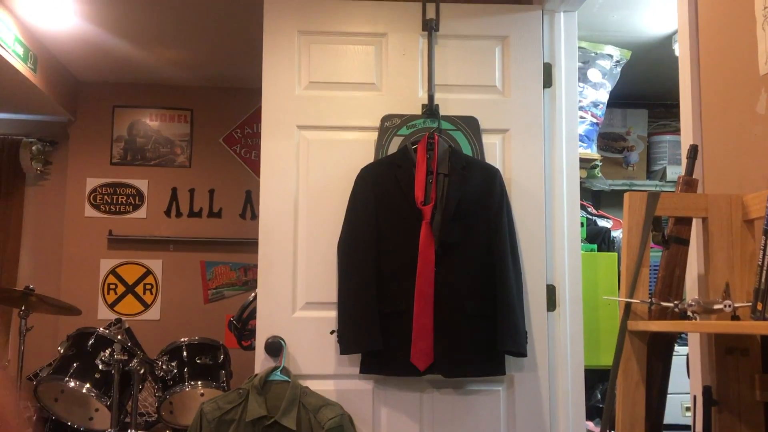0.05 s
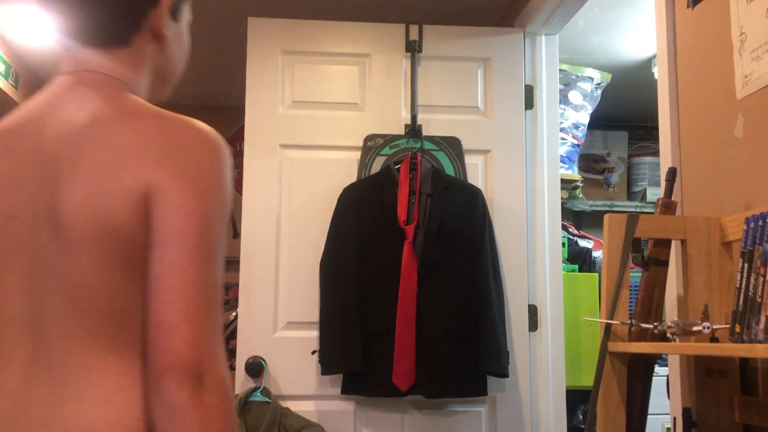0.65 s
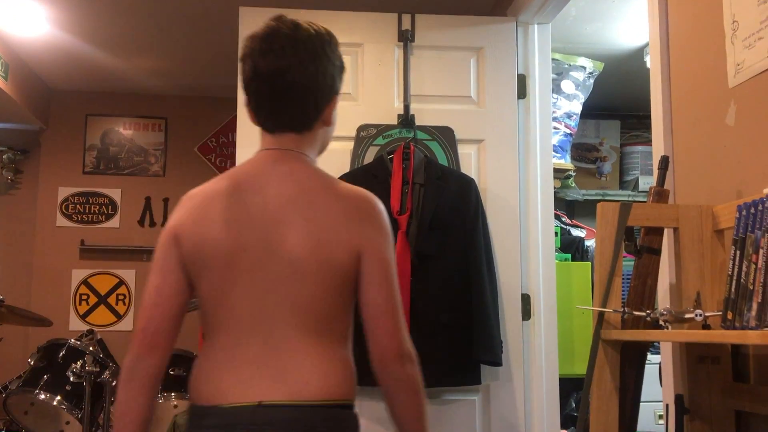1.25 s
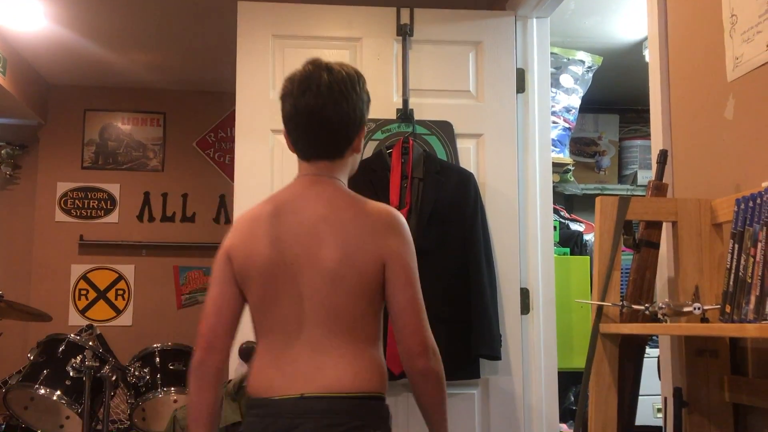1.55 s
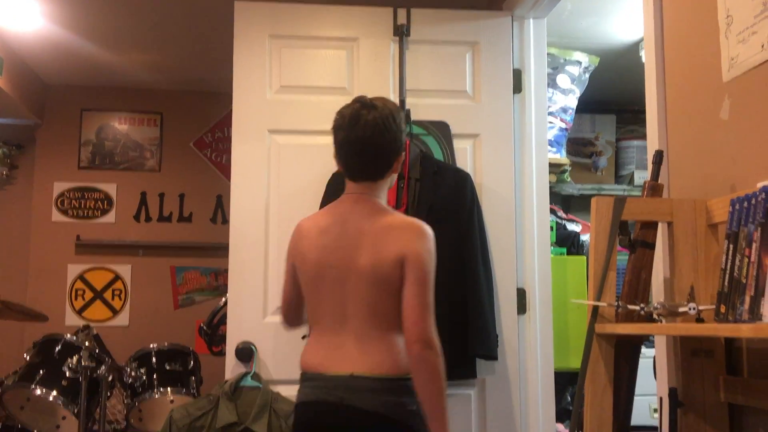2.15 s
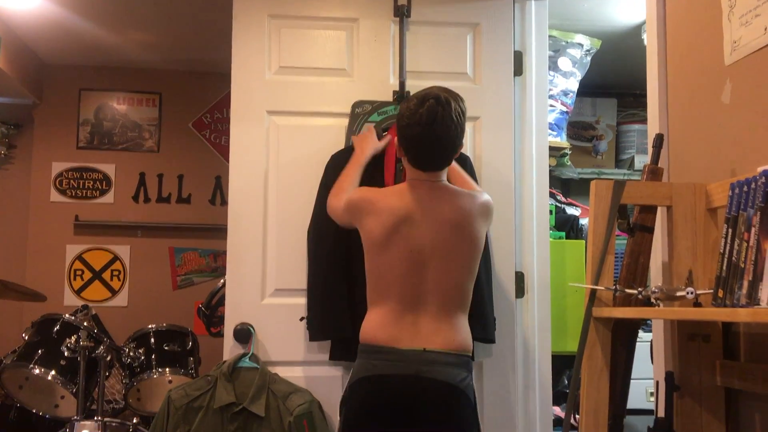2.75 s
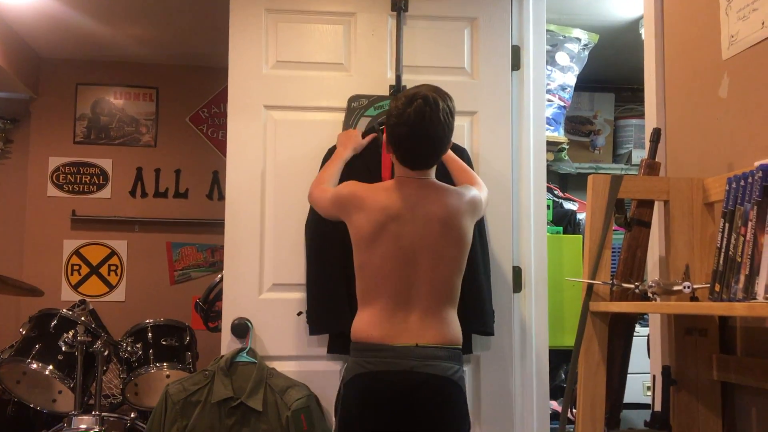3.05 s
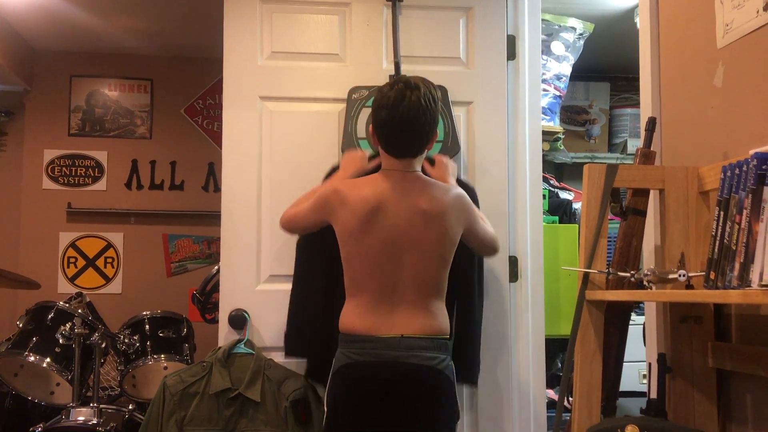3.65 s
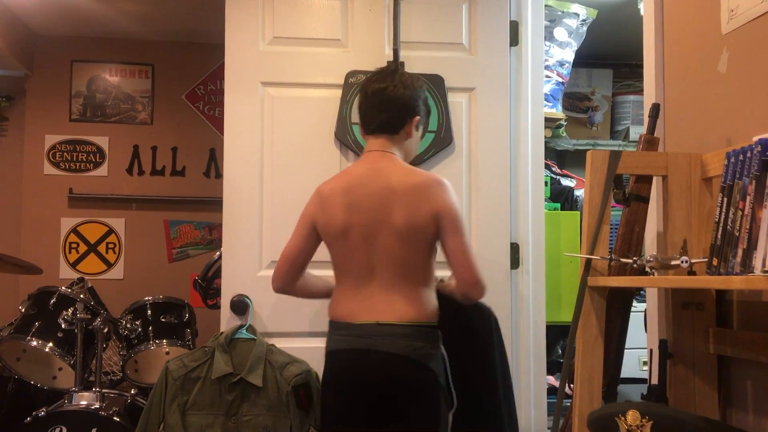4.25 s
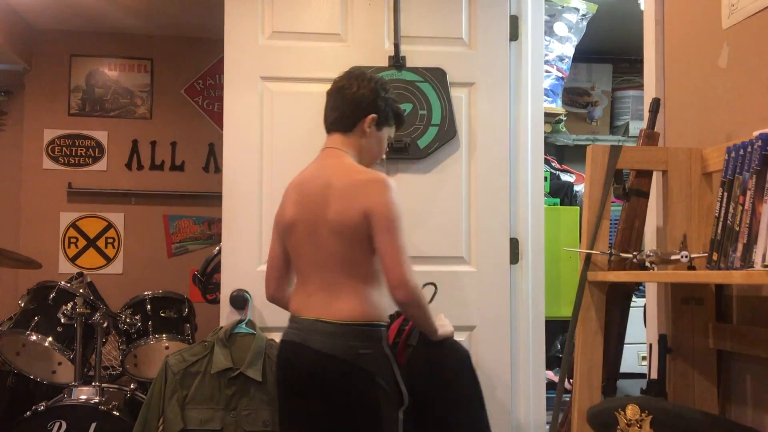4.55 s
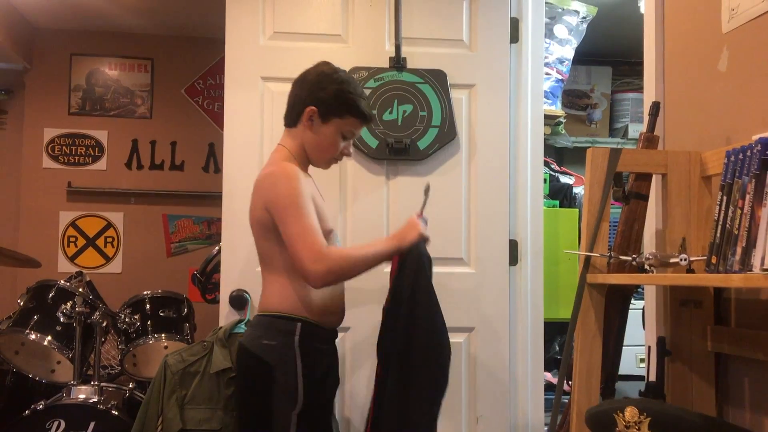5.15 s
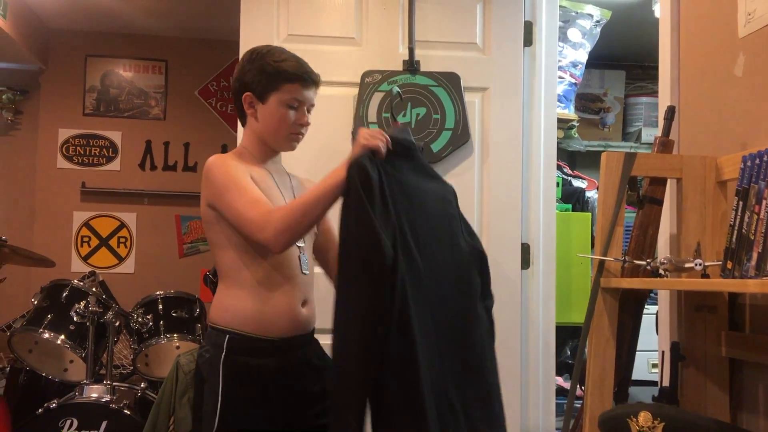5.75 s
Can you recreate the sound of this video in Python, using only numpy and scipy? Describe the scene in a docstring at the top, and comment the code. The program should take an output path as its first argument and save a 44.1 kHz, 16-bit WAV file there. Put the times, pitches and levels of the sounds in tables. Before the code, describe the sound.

Dull, booming barefoot steps move unevenly over wooden boards in a small furnished room, soles scuffing and clothes swishing softly. A hanger with a metal hook taps a door several times as a jacket comes down. Then the steps bunch together as the person turns, the fabric rustles and the boards pop more sharply. The microphone picks up a steady low rumble, with its own faint hiss and rapid ticking.

```python
"""A small bedroom: low room rumble, microphone hiss and faintly ticking camera electronics run throughout.
Someone crosses it barefoot: heels boom in the wooden floor, soles scuff, cloth rustles, a few boards pop.
Around 3 s they lift a jacket off the door; its hanger knocks on the panel, with a bright edge from the hook.
From about 4.3 s they turn with it, in a huddle of quick steps, brushing cloth and louder creaks."""
import sys
import numpy as np
from scipy import signal
from scipy.fft import rfft, irfft
from scipy.io import wavfile
from scipy.ndimage import uniform_filter1d

SR = 44100
rng = np.random.default_rng(int(sys.argv[2]) if len(sys.argv) > 2 else 0)


def inscribe(sig):
    """Save sig as 16-bit PCM at rate SR to the path in sys.argv[1].

    A 1-D sig is mono; a 2-D sig holds one channel per row.
    Samples are clipped to [-1, 1] before scaling.
    """
    pcm = np.round(np.clip(np.atleast_2d(sig).T, -1, 1) * 32767)
    wavfile.write(sys.argv[1], SR, pcm.astype(np.int16))


N = 259308
TIME = np.arange(N) / SR

# Footfalls and shifts of weight: (time [s], boom level [dB], boom pitch [Hz], boom t60 [s],
# knock level [dB], board pitch [Hz], sole scuff level [dB])
FOOTFALLS = [(0.284, -26, 59, 0.26, -41, 192.3, -57), (0.52, -53, 60, .15, -35, 162.6, -67),
             (1.256, -28, 57, 0.3, -38, 172, -48), (1.742, -27.5, 57, 0.28, -45.5, 172.7, -44),
             (2.074, -44, 62, 0.11, -53.5, 109, -63), (2.16, -42, 57.3, 0.15, -53, 156, -59.5),
             (2.226, -39.5, 54.3, 0.34, -53.5, 177.7, -49), (2.626, -29.5, 64, .42, -48.5, 160, -55),
             (2.972, -43, 54.7, 0.4, -41, 173, -67), (3.625, -25, 59, .33, -31.5, 178.4, -47),
             (4.324, -30.5, 71.5, 0.15, -39, 132, -46), (4.373, -29.5, 53.5, 0.11, -44.5, 181.2, -69),
             (4.799, -34.5, 57, 0.1, -51, 172, -60), (4.855, -23, 65.4, .1, -45, 173.3, -48.5),
             (4.943, -34.5, 64, 0.27, -44.5, 162.8, -56), (5.228, -25.5, 59.5, 0.2, -64, 130, -56),
             (5.366, -32.5, 53, .09, -50, 131, -57), (5.441, -29.5, 63, 0.057, -44.5, 163.1, -51.5),
             (5.717, -33, 52, 0.18, -51, 138, -67)]


def undb(db):
    """Decibels to gain."""
    return 10 ** (np.asarray(db) / 20)


def unit(x):
    """Scale to rms 1."""
    return x / np.sqrt(np.mean(x ** 2))


def add(out, s, sound):
    """Mix a sound in at s seconds."""
    start = max(int(s * SR), 0)
    out[start:start + len(sound)] += sound[:N - start]


def noise(colour):
    """Noise at rms 1, shaped by (frequency [Hz], level [dB]) points; 20 dB/octave roll-off past the ends."""
    hz, db = np.transpose(colour)
    octave = np.log2(np.maximum(np.fft.rfftfreq(N, 1 / SR), 1))
    outside = np.abs(octave - np.clip(octave, np.log2(hz[0]), np.log2(hz[-1])))
    eq = undb(np.interp(octave, np.log2(hz), db) - 20 * outside)
    return unit(irfft(rfft(rng.standard_normal(N)) * eq, N))


def resonate(x, hz, width_hz):
    """One resonance, gain 1 at its centre."""
    return signal.lfilter(*signal.iirpeak(hz, hz / width_hz, fs=SR), x)


def wander(rate):
    """Random modulation with a spread near 1, gliding to a new value rate times a second."""
    return np.interp(TIME * rate, np.arange(4096), rng.standard_normal(4096))


def swell(t, rise, t60):
    """Contact envelope: a rounded attack, then a decay of 60 dB in t60 seconds."""
    attack = np.sin(np.pi / 2 * np.minimum(t / rise, 1)) ** 2
    return attack * np.exp(-np.log(1000) * np.maximum(t - rise, 0) / t60)


def ringing(modes):
    """Resonances stirred at random, as by a room's many reflections, held at a steady rms of 1."""
    scatter = noise([(250, 10), (400, -5), (2200, -10), (3000, -13.5)])
    ring = sum(undb(db) * resonate(np.roll(scatter, rng.integers(N)), hz, width)
               for hz, width, db in modes)
    return ring / np.sqrt(uniform_filter1d(ring ** 2, size=880))


def contacts(hits, body, bright, size=22050):
    """Each contact stirs a body, a hollow ring and a bright edge that dies sooner."""
    # The furnished room's hollow ring: (frequency [Hz], width [Hz], level [dB])
    room_modes = [(962, 120, 4), (1109, 106, 7), (1352, 15, 9.5), (1490, 250, 2.5), (1843, 26, 7.5),
                  (2105, 44, 3)]
    out, t, ring = np.zeros(N), TIME[:size], ringing(room_modes)
    for s, db, ring_db, bright_db, rise, t60 in hits:
        at = rng.integers(N - size) + np.arange(size)
        dull = (body[at] + undb(ring_db) * ring[at]) * swell(t, rise, t60)
        edge = undb(bright_db) * bright[at] * swell(t, rise, 0.85 * t60)
        add(out, s, undb(db) * (dull + edge))
    return out


def room(x, wet_db, t60, size=17640):
    """Close walls add a short reverb tail."""
    tail = noise([(100, -17), (2000, -15), (8000, -2)])[:size] * swell(TIME[:size], 0.0031, t60)
    return x + undb(wet_db) * signal.fftconvolve(x, tail / np.linalg.norm(tail))[:N]


def rumble():
    """The room tone: a low bed whose level drifts gently."""
    # Rumble colour: (frequency [Hz], level [dB])
    colour = [(20, -27), (33, -28), (42, 1), (52, -7.5), (62, 3), (80, -11), (120, -15), (300, -21.5),
              (700, -45), (2000, -69), (3000, -54)]
    return noise(colour) * undb(-52.5 + 1.6 * wander(rate=3.2))


def tick_times(fast_s=0.05, slow_s=1, late_share=0.55, late_max_s=0.01, jitter_s=0.0003):
    """A fast clock beats unsteadily, and every other beat may drag; a slow, even clock joins in."""
    beats = np.arange(0.0178, TIME[-1], fast_s)
    chance, delay = rng.random((len(beats), 2)).T
    late = (np.arange(len(beats)) % 2 == 1) & (chance < late_share)
    beats = beats + late * late_max_s * np.sqrt(delay) + jitter_s * rng.standard_normal(len(beats))
    return np.append(beats, np.arange(0.103, TIME[-1], slow_s))


def camera(pip_hz=2130, weak_every_s=0.3):
    """Electrical spikes tick through one resonant path, over steady hiss; each pip brings its own spike."""
    # Dry pips among the ticks: (time [s], level [dB])
    pip_cues = [(0.068, -47.5), (0.725, -42.5), (1.025, -45.5), (1.577, -46), (1.924, -44), (2.077, -49),
                (2.397, -47), (2.807, -44), (3.080, -43.5), (3.425, -46), (4.025, -45.5), (4.854, -44.5),
                (5.674, -46)]
    # The ring of a tick: (frequency [Hz], width [Hz], level [dB])
    tick_modes = [(2070, 700, -5), (4210, 230, -8.5), (5950, 720, 0.5), (7580, 430, -8.5),
                  (8150, 180, -7.5), (9650, 380, -13.5), (10850, 680, -15.5), (12300, 1500, -15.5),
                  (14000, 570, -16)]
    spikes, pips, t = np.zeros(N), np.zeros(N), TIME[:512]
    for s in tick_times():
        add(spikes, s, undb([1.5 * rng.standard_normal()]))
    for s in np.arange(0.13, TIME[-1], weak_every_s):  # a third clock, slightly weaker
        add(spikes, s, undb([-1]))
    pip = swell(t, rise=0.0014, t60=0.0035) * np.sin(2 * np.pi * pip_hz * t)
    for s, db in pip_cues:
        add(pips, s, undb(db) * pip)
        add(spikes, s, undb([-3]))
    # neighbouring resonances have opposite polarity, which smears each tick a little
    ticks = sum((-1) ** k * undb(db) * resonate(spikes, hz, width)
                for k, (hz, width, db) in enumerate(tick_modes))
    # Microphone hiss: (frequency [Hz], level [dB])
    hiss_colour = [(1000, 3.5), (2200, 1), (3200, -5), (4500, -1), (6100, 0.5), (7800, -4), (9200, -3),
                   (10300, -7), (11300, -8), (12700, -3.5), (15500, -9)]
    return undb(-23.5) * ticks + pips + undb(-70) * noise(hiss_colour)


def swishes():
    """Fine weave sliding on itself gives a thin, airy swish that swells and fades."""
    # Slides of cloth over cloth: (time [s], level [dB], length [s])
    slides = [(0.042, -74, .1), (0.536, -70, 0.18), (2.05, -72, 0.1), (3.036, -72, 0.36), (4.04, -69, .14),
              (4.14, -75, 0.25)]
    # Sheen of the weave: (frequency [Hz], level [dB])
    weave_colour = [(3500, -6), (5000, -2), (8500, -2), (10300, -5), (12000, 0), (13500, -4), (15500, -10)]
    speed = np.zeros(N)
    for s, db, length in slides:
        add(speed, s, undb(db) * np.hanning(int(length * SR)))
    grip = undb(2 * wander(rate=150))
    return speed * grip * noise(weave_colour)


def rustle(flap_trim_db=-1.5, shake_trim_db=-9.5):
    """Moving clothes rustle in small grains and flap softly; each footfall shakes out more flapping."""
    # Level ride as body and jacket move: (time [s], rustle level [dB], flap level [dB])
    motion = [(0.0, -66.5, -59), (0.24, -68.5, -47.5), (0.54, -59, -52.5), (0.67, -57, -48),
              (0.83, -70, -50), (1.1, -63, -62), (1.26, -64.5, -54), (2.01, -70, -58.5), (2.95, -65, -59),
              (3.1, -63.5, -52.5), (3.36, -67, -58.5), (3.77, -60, -49.5), (4.13, -66, -60),
              (4.5, -61.5, -58), (5.31, -64.5, -58.5), (5.45, -59.5, -57), (5.75, -62.5, -47),
              (5.88, -54.5, -47)]
    # Colours of the rustle and the low flapping: (frequency [Hz], level [dB])
    cloth_colour = [(350, -6.5), (600, 7.5), (850, -2), (1200, 1.5), (2000, -1), (2800, -14.5), (5000, -17),
                    (12000, -27.5)]
    flap_colour = [(70, 8), (120, 3.5), (175, 3), (240, -0.5), (330, 0), (480, -24), (800, -21.5)]
    times, cloth_db, flap_db = np.transpose(motion)
    grains_db = 1.8 * wander(rate=35) + 2.5 * wander(rate=400)
    folds_db = 2.2 * wander(rate=25)
    shake = np.zeros(N)
    for s, _, _, _, knock_db, *_ in FOOTFALLS:
        add(shake, s, undb(knock_db + shake_trim_db) * swell(TIME[:SR], rise=0.059, t60=0.34))
    cloth = noise(cloth_colour) * undb(np.interp(TIME, times, cloth_db) + grains_db)
    sway = undb(np.interp(TIME, times, flap_db) + flap_trim_db)
    flap = noise(flap_colour) * np.hypot(sway, shake) * undb(folds_db)
    return cloth + flap


def scuffs():
    """Soles at each footfall, and cloth in between, catch and slip unevenly as they brush past."""
    # Cloth and skin brushing by: (time [s], level [dB], brightness [dB], rise [s], t60 [s])
    brushes = [(0.116, -61, -5, 0.0027, 0.22), (0.525, -52, -10, 0.0016, 0.75),
               (0.587, -43, -35, 0.007, .16), (0.751, -52, -2, 0.019, 0.25), (1.080, -59.5, 0, 0.024, .4),
               (1.198, -55, -16, .003, .1), (1.299, -67, -25, 0.00092, 0.17),
               (2.537, -61, -16, 0.0095, 0.25), (4.085, -58.5, 1, 0.0029, 0.3),
               (4.204, -57.5, -19, 0.0033, 0.15), (4.295, -52, -22, 0.0015, 0.12),
               (4.530, -52, -41, 0.0044, 0.19), (4.614, -63.5, 11.5, 0.0078, 0.17),
               (5.067, -53, -2.5, 0.0046, 0.22), (5.435, -46.5, -13, 0.012, 0.21),
               (5.603, -56.5, -4, 0.0058, 0.5)]
    # Body of a scuff: (frequency [Hz], level [dB])
    scuff_colour = [(200, 3), (290, 8), (400, 3.5), (490, -5), (630, 4.5), (820, -6), (1050, -17),
                    (1350, -14), (1950, -16), (2770, -62), (3500, -68)]
    lead_s, sole_rise_s, sole_t60_s = 0.014, 0.008, 0.48  # the sole brushes just before the weight lands
    sole_ring_db, sole_bright_db, cloth_ring_db = -9, -13.5, -0.2
    grip = unit(undb(2.8 * wander(rate=220)))
    rasp = noise([(1700, 25), (2250, 18.5), (2700, 10.5), (4800, 4.5), (6500, 6), (12000, -17)])
    soles = [(s - lead_s, db, sole_ring_db, sole_bright_db, sole_rise_s, sole_t60_s)
             for s, *_, db in FOOTFALLS]
    cloth = [(s, db, cloth_ring_db, bright_db, rise, t60) for s, db, bright_db, rise, t60 in brushes]
    return contacts(soles + cloth, body=grip * noise(scuff_colour), bright=grip * rasp)


def hanger(rise_s=0.0072):
    """Taps ring the door panel; the metal hook adds a bright edge."""
    # Stray taps on the way, then the hanger against hook and door:
    # (time [s], level [dB], room ring [dB], brightness [dB], t60 [s])
    taps = [(0.343, -44, -2, -5.5, 0.2), (1.563, -48, -4, -26, 0.14), (2.887, -46.5, -5, -21, 0.3),
            (2.962, -45, -5.5, -19, 0.28), (3.120, -49.5, -19, -16, 0.13), (3.285, -56.5, -0.5, -8, .2),
            (3.333, -42.5, -3.5, -10, .17), (3.501, -52.5, -0.5, -13, 0.16), (3.610, -41.5, -4, -24, 0.14)]
    # Door panel resonances: (frequency [Hz], width [Hz], level [dB])
    door_modes = [(314, 67, -13), (376, 19, 4.5), (640, 280, -5), (900, 220, -15.5), (1194, 86, -5)]
    hook = noise([(2300, 14), (2900, -2), (3500, 2), (4100, 2), (4450, 9), (4900, -5),
                  (5600, 0), (11000, -39)])
    hits = [(s, db, ring_db, bright_db, rise_s, t60) for s, db, ring_db, bright_db, t60 in taps]
    return contacts(hits, body=ringing(door_modes), bright=hook)


def creaks(slip_gap_s=0.021, pitch_spread=0.09, max_slips=8):
    """A loaded board slips once or in a run: each slip is a pop that sags in pitch, with a softer rebound."""
    # Creaking boards: (time [s], level [dB], nominal pitch [Hz], length [s])
    boards = [(0.147, -43.5, 366, .03), (0.192, -39, 398, .01), (0.451, -47, 330, .01),
              (1.418, -36, 526, .01), (1.466, -40, 480, .01), (2.545, -42, 360, .01),
              (3.858, -45, 600, .01), (4.756, -36.5, 340, .03), (4.93, -38, 340, .01),
              (4.958, -40, 505, .01), (5.219, -40.5, 420, .115), (5.478, -39, 574, .01),
              (5.517, -31, 396, .01), (5.58, -27.5, 458, .01)]
    out, t = np.zeros(N), TIME[:4410]
    sag = 0.72 + 0.5 * np.exp(-t / 0.0037)
    envelope = swell(t, rise=0.0041, t60=0.0069)
    for start, db, hz, length in boards:
        scatter = rng.standard_normal((max_slips, 3))
        scatter[0] = 0  # the first slip lands on cue; the rest scatter in time, level and pitch
        for after, (early, accent_db, detune) in zip(np.arange(0, length, slip_gap_s), scatter):
            pitch = hz * (1 + pitch_spread * detune) * sag
            pop = undb(db + accent_db) * envelope * np.sin(2 * np.pi * np.cumsum(pitch) / SR)
            s = start + after - 0.0029 * early
            add(out, s, pop)
            add(out, s + rng.uniform(0.0037, 0.00692), undb(-4) * pop)  # rebound
    return out


def footsteps(joist_hz=38.3, size=22050):
    """A heel sets the floor's low mode and joists booming; the board underfoot and higher modes knock."""
    # The floor's many higher modes: (frequency [Hz], level [dB])
    knock_colour = [(75, -24), (100, 6.5), (120, -10.5), (145, -6), (190, 0), (250, -11.5), (300, -9),
                    (400, -22), (480, -26), (630, -30), (900, -33)]
    out, t = np.zeros(N), TIME[:size]
    modes = noise(knock_colour)
    modes /= np.sqrt(uniform_filter1d(modes ** 2, size=1100))  # equal blows carry equal energy
    knock_envelope = swell(t, rise=0.014, t60=0.36)  # a bare foot lands softly
    joists = undb(-11.5) * np.sin(2 * np.pi * joist_hz * t)
    for s, boom_db, boom_hz, t60, knock_db, board_hz, _ in FOOTFALLS:
        boom = swell(t, rise=0.023, t60=t60) * (np.sin(2 * np.pi * boom_hz * t) + joists)
        floor = undb(-0.9) * np.roll(modes, rng.integers(N))[:size]
        board = undb(0.5) * np.sin(2 * np.pi * board_hz * t)
        add(out, s, undb(boom_db) * boom + undb(knock_db) * knock_envelope * (floor + board))
    return out


def scene():
    """The mono mix: all sources over the room's rumble, with a short reverb on the creaks."""
    bed = rumble()
    boards = room(creaks(), wet_db=-10.5, t60=0.18)
    return (footsteps() + boards + scuffs() + hanger() + rustle() + swishes() + camera() + bed)[None]


def record(dry):
    """A steep low-pass cuts the very top."""
    cutoff_hz = 15900
    return signal.sosfilt(signal.ellip(10, 0.2, 70, cutoff_hz, fs=SR, output="sos"), dry)


dry = scene()
out = record(dry)
inscribe(out)
```